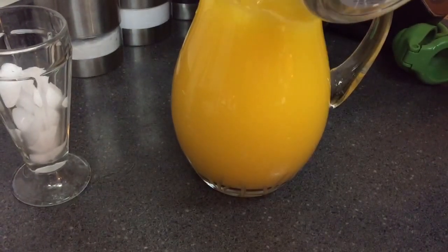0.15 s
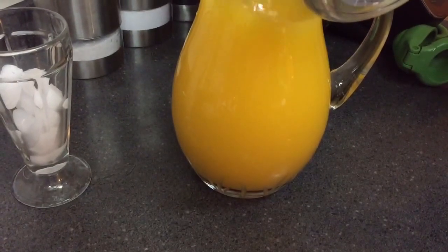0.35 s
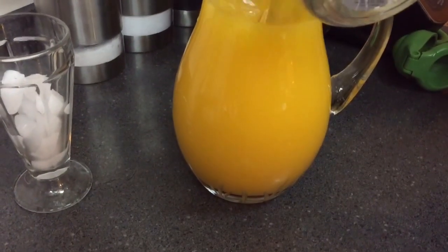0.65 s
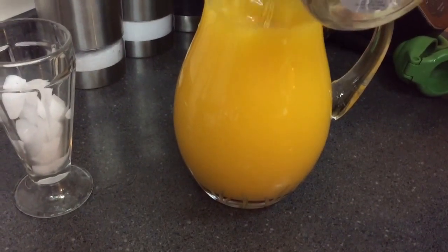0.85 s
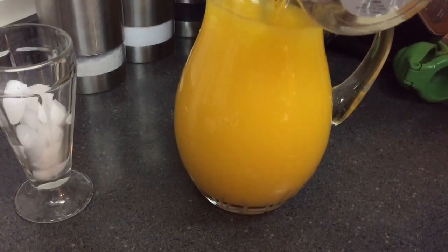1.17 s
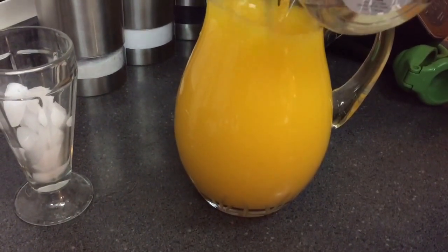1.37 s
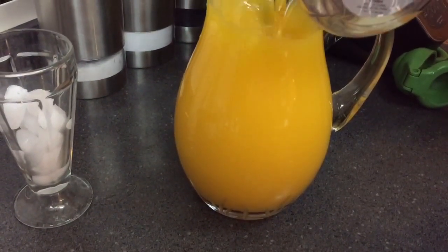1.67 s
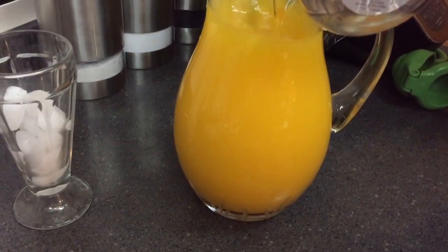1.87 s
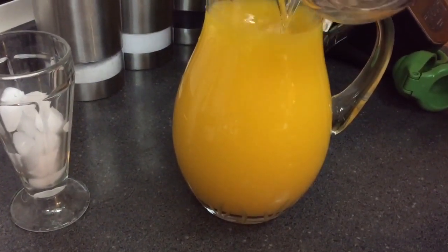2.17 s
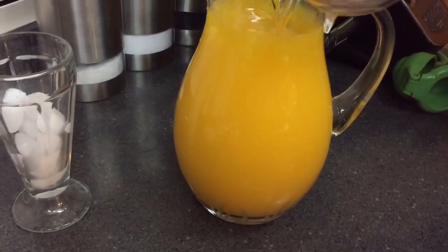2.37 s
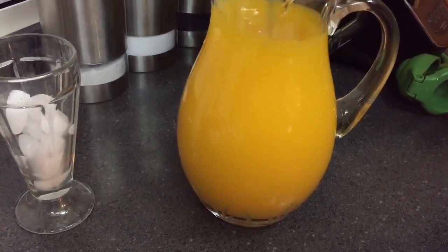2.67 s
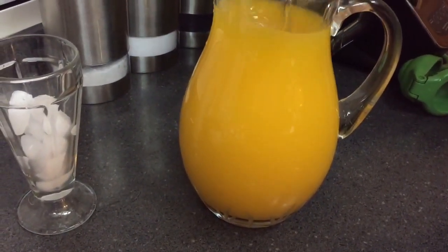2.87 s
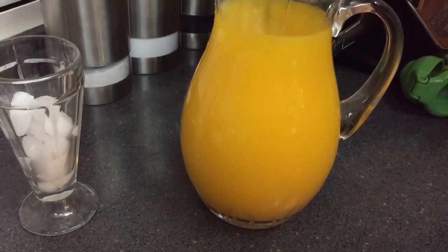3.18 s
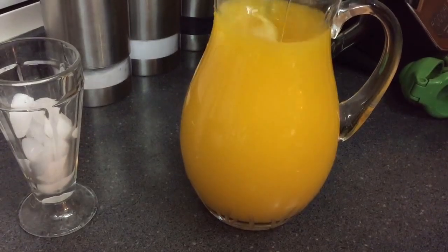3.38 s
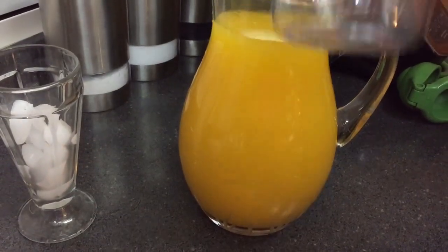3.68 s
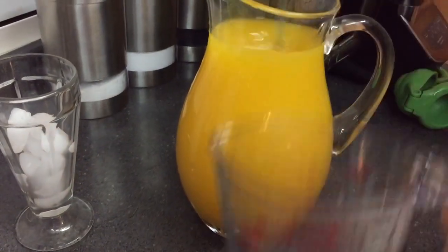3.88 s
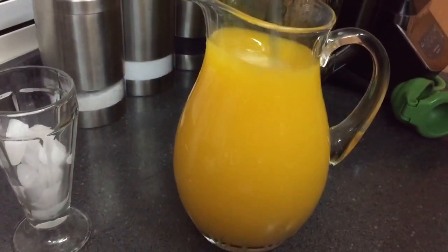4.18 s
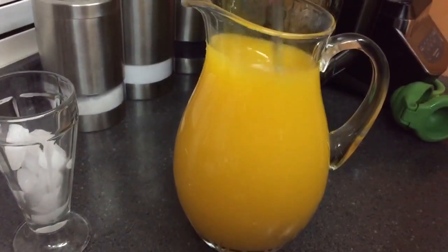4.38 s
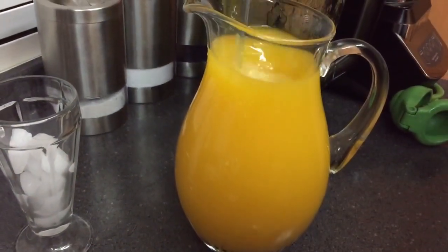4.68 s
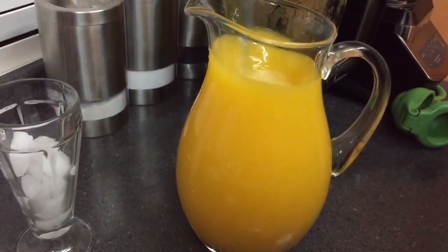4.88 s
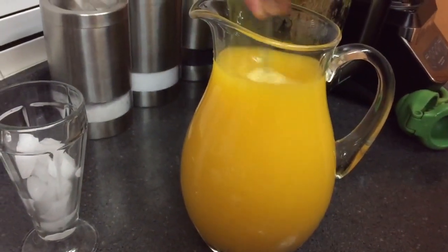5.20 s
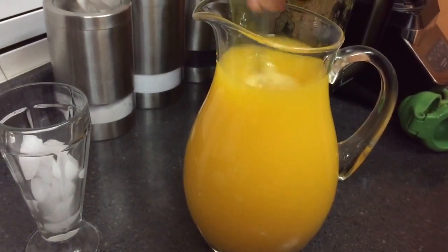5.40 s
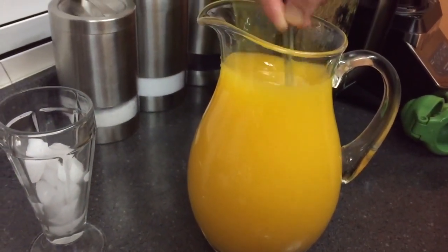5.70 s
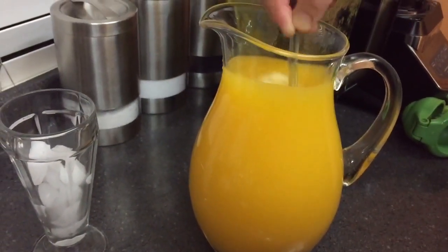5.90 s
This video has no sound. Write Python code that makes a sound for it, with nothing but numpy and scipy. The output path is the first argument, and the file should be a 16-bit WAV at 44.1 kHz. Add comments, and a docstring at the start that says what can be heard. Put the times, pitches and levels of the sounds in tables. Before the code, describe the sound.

From the start, juice pours from a jar into a full glass pitcher, gurgling, plopping and spattering in small surges. At the same time a long spoon knocks the pitcher's wall four or five times a second, each knock a short, damped clack with a soft low thump from the counter. The stirring pauses at about 2.7 seconds and the pour dies away by 3. Between 3 and 3.7 seconds the jar clinks lightly and scrapes on the rim, with a couple of low glugs. Stirring resumes near 4 seconds, shorter and sharper, and continues to about 6. At 4.5 seconds the empty jar lands on the counter with a bright knock, the loudest sound, then slides briefly, and slides again just after 5. It knocks once more near 6 seconds. Everything sounds close, in a quiet kitchen with a faint low rumble.

```python
"""Pouring and stirring juice

Juice bubbles and spatters from a glass jar into a full glass pitcher on a kitchen counter.
A long spoon knocks the wall four or five times a second; the liquid damps the glass to a short clack.
The jar clinks and scrapes on the rim, then is set down empty and pushed along as the stirring goes on."""
import sys
import numpy as np
from scipy import signal
from scipy.io import wavfile
from scipy.ndimage import uniform_filter1d

SR = 44100
rng = np.random.default_rng(int(sys.argv[2]) if len(sys.argv) > 2 else 0)


def dump_mix(stems):
    """Bounce the given channels to the path in sys.argv[1] as a 16-bit WAV at rate SR."""
    frames = np.atleast_2d(stems).T  # one column per channel
    limited = np.clip(frames, -1, 1)  # hard clip at full scale
    pcm = np.round(limited * 32767).astype(np.int16)
    wavfile.write(sys.argv[1], SR, pcm)


N = 266805
EDGE_HZ = 15600


def amp(db):
    return 10 ** (np.asarray(db) / 20)


def unit_rms(x):
    return x / np.sqrt(np.mean(x ** 2) + 1e-20)


def unit_energy(x):
    return x / np.sqrt(np.sum(x ** 2, -1, keepdims=True) + 1e-20)


def log_interp(points, hz):
    f, value = np.transpose(points)
    return np.interp(np.log(hz + 1), np.log(f + 1), value)


def add(mix, start_s, sound):
    part = mix[max(round(start_s * SR), 0):][:len(sound)]
    part += sound[:len(part)]


def colour(x, points):
    """Minimum-phase filter through (Hz, dB) points."""
    log_gain = np.log(amp(log_interp(points, abs(np.fft.fftfreq(4096, 1 / SR)))))
    taps = np.fft.ifft(np.exp(np.conj(signal.hilbert(log_gain)))).real
    return signal.fftconvolve(x, taps[:len(taps) // 2])[:len(x)]


def swell(start_s, length_s, attack_s, release_s):
    """Linear rise, hold until length_s, exponential fall."""
    t = np.arange(N) / SR - start_s
    return np.clip(t / attack_s, 0, 1) * np.exp(-np.maximum(t - length_s, 0) / release_s)


def wander(depth_db, samples):
    """Smooth random gain."""
    return amp(depth_db * unit_rms(uniform_filter1d(rng.standard_normal(N), size=samples)))


def bubble(hz, cycles, glide):
    """A dying sine; with glide its pitch climbs, as a bubble's does near the surface."""
    turns = np.arange(int(5 * cycles * SR / hz) + 2) * hz / SR
    age = turns / cycles
    return np.sin(2 * np.pi * turns * (1 + glide * age)) * np.exp(-age) * (1 - np.exp(-turns))


def bubbles(per_s, hz, octaves, cycles, range_db):
    """A steady random stream of bubbles around one pitch, rms 1."""
    out = np.zeros(N)
    for when, pitch, size in rng.random((int(per_s * N / SR), 3)):
        pop = bubble(hz * 2 ** (octaves * (2 * pitch - 1)), cycles, glide=0.0068)
        add(out, when * N / SR, amp(range_db * size) * pop)
    return unit_rms(out)


# Kitchen air. Each row: frequency in Hz, relative density in dB.
AIR_SPECTRUM = [(15, -47), (25, -6.5), (86, -2), (193, 2.5), (389, -9), (782, -17.5), (1050, -14),
                (1530, -21), (1900, -18), (2490, -20), (3260, -23.5), (6050, -26), (14300, -34),
                (15500, -34.5)]


def room_tone(pour_end_s=3.03):
    """Quiet air and a lumpy low rumble that swells briefly as the pour ends."""
    air = unit_rms(colour(rng.standard_normal(N), AIR_SPECTRUM))
    rumble_spectrum = [(20, -15.5), (45, -5.5), (78, 16), (130, -13), (260, -27.5), (600, -45)]
    rumble = unit_rms(colour(rng.standard_normal(N), rumble_spectrum)) * wander(3.5, samples=3000)
    lift = 1 + swell(pour_end_s, length_s=0.52, attack_s=0.013, release_s=0.04)
    return amp(-65) * air + amp(-69) * rumble * lift


# Surges, about one per turn of the spoon. Each row: start in seconds, gurgle in dB, spatter in dB.
STREAM_SURGES = [(0.059, -74, -66), (0.56, -57, -69), (0.958, -49, -62), (1.412, -65, -58.5),
                 (1.852, -79, -61), (2.47, -61.5, -65), (2.81, -68, -64)]


def pour():
    """The stream gurgles in the pitcher's neck, resonant near 1 kHz, sheds larger bubbles and spatters."""
    neck = bubbles(per_s=90, hz=1000, octaves=0.17, cycles=7, range_db=16)
    gurgle = bubbles(per_s=600, hz=1450, octaves=1.15, cycles=5, range_db=20)
    blips = bubbles(per_s=45, hz=1500, octaves=0.8, cycles=12, range_db=14)
    spatter = bubbles(per_s=1800, hz=4200, octaves=0.7, cycles=9, range_db=20)
    mist = bubbles(per_s=3000, hz=10500, octaves=0.5, cycles=9, range_db=14)
    low = amp(-0.8) * neck + amp(-6) * gurgle + amp(-2.5) * blips
    high = amp(-9) * spatter + amp(-21.5) * mist
    flow = swell(0, length_s=2.53, attack_s=0.024, release_s=0.12)
    out = (amp(-68) * low + amp(-66.5) * high) * flow
    for start_s, gurgle_db, spatter_db in STREAM_SURGES:
        surge = swell(start_s, length_s=0.071, attack_s=0.024, release_s=0.024)
        out += (amp(gurgle_db) * low + amp(spatter_db) * high) * surge
    return out


def burst(db, hz, octaves, length_s, count=130):
    """A clump of tiny bubbles popping."""
    out = np.zeros(SR // 4)
    for when, pitch, size in zip(rng.random(count), rng.standard_normal(count), rng.random(count)):
        pop = bubble(np.clip(hz * 2 ** (octaves * pitch), 500, EDGE_HZ), cycles=14.5, glide=0.006)
        add(out, when * length_s, amp(18 * size) * pop)
    return amp(db - 7.5) * unit_energy(out) * np.sqrt(length_s * SR)


# Loudest spray. Each row: start in seconds, relative level in dB, centre in Hz, spread in octaves,
# length in seconds.
SPRAY_BURSTS = [(0.062, -51.5, 6800, 0.47, 0.041), (0.133, -59, 5000, 0.22, 0.061),
                (0.302, -56, 8040, 0.57, 0.03), (0.547, -45, 5000, 0.4, 0.015),
                (1.472, -55, 11600, 0.13, 0.01), (1.475, -46, 1690, 0.025, 0.048),
                (1.506, -48.5, 5600, 0.54, 0.011), (1.716, -47.5, 12350, 0.041, 0.025),
                (1.712, -46.5, 2430, 0.54, 0.037), (1.759, -51, 12500, .07, 0.013),
                (1.881, -45.5, 5100, 0.116, 0.011), (1.89, -51, 10500, 0.335, 0.019),
                (1.938, -49.5, 4750, .9, 0.044), (2.394, -51.5, 4060, 0.81, 0.027),
                (2.492, -48.5, 2930, 0.24, 0.034), (2.562, -47, 2250, 1, 0.023),
                (2.851, -50.5, 1610, 0.58, 0.027), (3.253, -47, 5760, 0.16, 0.0081)]


def spray(faint_count=14, faint_end_s=2.3):
    """Loud bursts of bubbles, with faint ones scattered over the strong part of the pour."""
    out = np.zeros(N)
    for start_s, *shape in SPRAY_BURSTS:
        add(out, start_s, burst(*shape))
    for k, (when, pitch) in enumerate(rng.random((faint_count, 2))):
        faint = burst(db=-66.5, hz=8600 * 2 ** (pitch - 0.5), octaves=0.46, length_s=0.018)
        add(out, (k + when) / faint_count * faint_end_s, faint)
    return out


# Dense short-lived modes of glass and spoon. Each row: frequency in Hz, relative density in dB.
CLACK_SPECTRUM = [(100, -24.5), (400, -1.5), (900, 0.5), (1400, -4.5), (1900, -1), (2550, -2), (3000, -9.5),
                  (4200, -13), (6000, -17), (7500, -29.5), (10000, -38.5), (15000, -50.5)]


def strike(modes, ring, rise_s, scatter_db, detune, phase_spread, clack_db, clack_t60_s):
    """A blow on glass: modes weighted by where it lands, plus a clack; ring scales all decay times."""
    t = np.arange(SR // 2) / SR
    hz, db, t60 = np.transpose(modes)[:, :, None]
    phase = phase_spread * rng.random(hz.shape)
    weight = amp(db + scatter_db * rng.standard_normal(hz.shape))
    hz = hz * (1 + detune * rng.standard_normal(hz.shape))  # the wall's load shifts between blows
    onset = 1 - np.exp(-(t / rise_s) ** 2)  # the bending wave fills the wall
    tones = unit_energy(np.sin(2 * np.pi * (hz * t + phase)) * amp(-60 * t / (t60 * ring)) * onset)
    body = unit_energy((weight * tones).sum(0))
    noise = rng.standard_normal(len(t)) * amp(-60 * t / (clack_t60_s * ring)) * (onset + 0.5)
    clack = unit_energy(colour(noise, CLACK_SPECTRUM))
    return unit_energy(body + amp(clack_db) * clack) * np.sqrt(0.03 * SR)  # energy of 30 ms at rms 1


# Filled pitcher. Each row: frequency in Hz, energy in dB, base t60 in seconds.
PITCHER_MODES = [(189.5, -23.5, 0.3), (266.5, -19.5, 0.22), (426, -21, 0.065), (469.5, -18.5, 0.12),
                 (635, -15, 0.12), (745, -17.5, 0.11), (823, -20, 0.093), (921, -12, 0.06),
                 (1010, -5.5, 0.063), (1041.5, -8, 0.048), (1179, -11.5, 0.064), (1354, -15.5, 0.031),
                 (1630, -16.5, .045), (1833, -15, 0.013), (2037, -23, 0.01), (2216, -24, 0.22),
                 (2420, -13.5, 0.087), (2458.5, -15.5, 0.093), (2660, -38.5, 0.147)]
# Tone bands of a contact, in Hz.
BANDS_HZ = [450, 1000, 2000, 4800, 11000]


def pitcher(db, gains_db, ring):
    """One contact rings the pitcher, coloured by gains_db at BANDS_HZ."""
    blow = strike(PITCHER_MODES, ring, rise_s=0.0022, scatter_db=2.5, detune=0.017,
                  phase_spread=1, clack_db=-2.5, clack_t60_s=0.048)
    return amp(db + 1.5) * colour(blow, list(zip(BANDS_HZ, gains_db)))


# Spoon knocks, two a turn. Each row: start in seconds, relative level in dB, bass in dB, hardness in dB.
SPOON_KNOCKS = [(0.0725, -36, -3, -14.5), (0.269, -35.5, -3, 1), (0.499, -38, 0, 2), (0.719, -32.5, 0, -6),
                (0.9232, -33.5, 4.5, 0.5), (1.13, -31, -1.5, -4), (1.3528, -39.5, 3, 2.5),
                (1.5765, -42, -5, -5.5), (1.7653, -36, -0.5, 3.5), (1.991, -37, -2, 3),
                (2.205, -36, -3, -3), (2.4276, -38.5, -0.5, -3), (2.661, -46, 1.5, 6),
                (3.9587, -40, 0, -10), (4.1498, -37, -2.5, 0.5), (4.2556, -39, -7, -5.5),
                (4.378, -38.5, -2.5, -1), (4.594, -35.5, -5, 1.5), (4.8179, -30.5, -11.5, -2),
                (4.9223, -48, -18, -5.5), (5.0537, -34.5, -3.5, -1), (5.0938, -44, -14, -8.5),
                (5.279, -28.5, -11, -3.5), (5.5, -30, -6.5, 0.5), (5.7168, -37.5, 6, 2.5),
                (5.924, -35, 2.5, -4.5), (6.022, -41, -10, -0.5)]
# A knock's top three bands. Each row: base gain in dB, dB per dB of hardness.
KNOCK_TREBLE = [(2.5, 0.73), (-0.93, 1.05), (1.5, 1.25)]


def spoon(low_grip_s=4.05, graze_s=0.024, rebound_s=0.06):
    """The spoon grazes, knocks and chatters on the wall; held lower, it knocks shorter and sharper."""
    out = np.zeros(N)
    for start_s, db, bass_db, hardness_db in SPOON_KNOCKS:
        mid_db, high_db, top_db = [base + slope * hardness_db for base, slope in KNOCK_TREBLE]
        ring, lift_db = (0.98, 0) if start_s < low_grip_s else (0.59, 2)
        knock = pitcher(db, [bass_db, 0, mid_db + lift_db, high_db, top_db], ring)
        add(out, start_s, knock)
        for before, after in rng.random((3, 2)):
            add(out, start_s - before * graze_s, amp(-26.5) * (1 - before) * knock)
            add(out, start_s + after * rebound_s, amp(-21) * (1 - after / 2) * knock)
    return out


# Countertop. Each row: frequency in Hz, relative level in dB, t60 in seconds.
COUNTER_MODES = [(48.2, -9, 0.4), (75.9, -4.5, 0.28), (101, -1.5, 0.15), (141, -9.5, 0.12)]


def counter_boom():
    """Each spoon knock pushes the countertop, which answers with a soft boom."""
    out, t = np.zeros(N), np.arange(SR // 2) / SR
    onset = 1 - np.exp(-t / 0.0045)
    for start_s, db, bass_db, _ in SPOON_KNOCKS:
        boom = sum(amp(mode_db - 60 * t / t60) * np.sin(2 * np.pi * (hz * t + rng.random()))
                   for hz, mode_db, t60 in COUNTER_MODES)
        add(out, start_s, amp(db + bass_db - 7) * boom * onset)
    return out


# Lumps of juice. Each row: start in seconds, relative level in dB, brightness in dB.
JUICE_PLOPS = [(0.4065, -57.5, 10), (0.5827, -49.5, -8), (0.6855, -36.5, -0.5), (0.7922, -47, 4),
               (0.897, -45, 0), (1.1071, -47, -6), (1.2113, -53.5, 8), (1.9342, -51, 7.5), (2.16, -54, 1),
               (2.4768, -46.5, 2), (2.8169, -45, -9.5)]


def plops():
    """Soft lumps drop into the neck and wake mostly the pitcher's resonance near 1 kHz."""
    out = np.zeros(N)
    for start_s, db, bright_db in JUICE_PLOPS:
        add(out, start_s, pitcher(db, [-3.5, -1, bright_db - 7, bright_db - 14, 6.5], ring=1.58))
    return out


# Rim on rim. Each row: start in seconds, relative level in dB, hardness in dB.
RIM_CLINKS = [(0.9121, -51, -8), (1.315, -56, -5.5), (3.0345, -55, -2.5), (3.457, -65, 9),
              (3.685, -46.5, -5)]


def rim_clinks():
    """The jar taps the pitcher: a light, very bright contact of glass on glass."""
    out = np.zeros(N)
    for start_s, db, hard_db in RIM_CLINKS:
        add(out, start_s, pitcher(db, [-1.5, 1, 6.5, 16.5 + hard_db, 36.5 + hard_db], ring=1.15))
    return out


# Low thumps. Each row: start in seconds, relative level in dB, pitch in Hz.
LOW_THUMPS = [(3.041, -48.5, 192), (3.238, -61, 268), (3.69, -41.5, 192), (5.573, -52, 318),
              (5.615, -44.5, 310)]


def low_thumps():
    """Short low tones, near 190 to 320 Hz, ring for a few cycles and die away."""
    out = np.zeros(N)
    for start_s, db, hz in LOW_THUMPS:
        add(out, start_s, amp(db + 6.5) * bubble(hz, cycles=2.25, glide=0.0018))
    return out


# Rim dragging on rim. Each row: frequency in Hz, relative density in dB.
SCRAPE_SPECTRUM = [(300, -44), (1100, 1), (1500, -12), (2200, 7.5), (3200, -16), (5600, 0), (9000, -16),
                   (15000, -21)]


def rim_scrape():
    """Tiny slips of glass on glass grow as the jar is drawn away."""
    slips = rng.standard_normal(N) * amp(4.2 * rng.exponential(1, N))
    drag = swell(start_s=3.385, length_s=0.079, attack_s=0.068, release_s=0.012)
    return amp(-56.5) * unit_rms(colour(slips, SCRAPE_SPECTRUM)) * drag


# Empty jar. Each row: frequency in Hz, energy in dB, base t60 in seconds.
JAR_MODES = [(190, -11.5, 0.29), (390, -8.5, 0.12), (414, -7, 0.36), (466, -6, 0.038), (524, -28.5, 0.062),
             (734, -3.5, 0.091), (833, -19, 0.2), (1470, -11, 0.15), (2115, 4.5, 0.082),
             (2127, -13.5, 0.12), (2380, -5.5, 0.032), (3690, -18, 0.034), (4150, -9.5, 0.057),
             (4340, -11, 0.013), (4880, -27, 0.028), (5480, -16, 0.029), (5780, -17.5, 0.035),
             (6900, -26.5, .035), (7600, -28, 0.029)]
# Landing, rocking back, late knock. Each row: start in seconds, relative level in dB, brightness in dB.
JAR_KNOCKS = [(4.4913, -21.5, -2), (4.5168, -27.5, -7.5), (6.0428, -26.5, -10.5)]


def jar_landing():
    """The jar hits the counter with a bright tick and rings briefly, damped by the hand."""
    out, t = np.zeros(N), np.arange(SR // 2) / SR
    grip = np.exp(-t / 0.04)
    tick_envelope = amp(-60 * t / 0.024) * np.clip(t / 0.00064, 0, 1)
    for start_s, db, bright_db in JAR_KNOCKS:
        blow = strike(JAR_MODES, ring=0.73, rise_s=0.0019, scatter_db=1.5, detune=0.00146,
                      phase_spread=0.45, clack_db=-14.5, clack_t60_s=0.018)
        tick = colour(rng.standard_normal(len(t)), [(3000, -21), (6000, 10.5), (13000, -1)])
        hit = grip * blow + amp(-10.5) * tick * tick_envelope
        add(out, start_s, amp(db + 3) * colour(hit, [(800, 0.0075), (2000, bright_db)]))
    return out


def counter_thud():
    """The countertop gives for a few low cycles as the jar first touches down."""
    out = np.zeros(N)
    add(out, JAR_KNOCKS[0][0], amp(-36.5) * bubble(hz=160, cycles=4.5, glide=0))
    return out


# Sliding jar. Each row: centre in Hz, width in Hz, relative level in dB.
RUB_RESONANCES = [(1020, 270, 7), (2280, 170, 9), (4060, 280, 2.5), (4750, 230, -6.5), (5460, 220, 5),
                  (6580, 350, -6), (7850, 180, -5), (8540, 300, -5.5), (9700, 200, -12.5),
                  (11600, 350, -13), (13160, 360, -8), (14750, 300, -12.5)]
# Pushes. Each row: start in seconds, length in seconds, relative rub in dB, judder in dB.
JAR_PUSHES = [(4.529, 0.34, -61, -56.5), (5.126, 0.24, -56, -52.5)]


def jar_sliding():
    """Tiny slips on the grainy counter give a rub with many narrow peaks, over a lumpy low judder."""
    hz = np.geomspace(300, EDGE_HZ, 600)
    centre, width, db = np.transpose(RUB_RESONANCES)[:, :, None]
    peaks = amp(db) / (1 + ((hz - centre) / width) ** 2)
    power = (peaks ** 2).sum(0) + amp(-21) ** 2
    catching = wander(1.9, samples=500)  # the base catches unevenly
    slips = rng.standard_normal(N) * amp(2.4 * rng.exponential(1, N)) * catching
    rub = unit_rms(colour(slips, np.c_[hz, 10 * np.log10(power)]))
    judder = bubbles(per_s=190, hz=394, octaves=0.47, cycles=2.7, range_db=17)  # short low rings
    out = np.zeros(N)
    for start_s, length_s, rub_db, judder_db in JAR_PUSHES:
        push = swell(start_s, length_s, attack_s=0.048, release_s=0.034)
        out += (amp(rub_db + 2) * rub + amp(judder_db) * judder) * push
    return out


# Room decay. Each row: frequency in Hz, t60 in seconds.
KITCHEN_T60 = [(100, 0.5), (300, 0.26), (1000, 0.22), (2500, 0.23), (6000, 0.14), (14000, 0.23)]


def kitchen(x, early_db, tail_db):
    """Near surfaces give a few quick echoes; the room adds a short tail."""
    t = np.arange(SR // 2) / SR
    taps = rng.choice([-1., 1.], len(t)) * (rng.random(len(t)) < 4000 / SR)
    build_up = np.clip(t / 0.0091, 0, 1) ** 2
    hz, when, spectra = signal.stft(taps * build_up, SR, nperseg=256)
    decay = amp(-60 * when / log_interp(KITCHEN_T60, hz)[:, None])
    tail = signal.istft(spectra * decay, SR, nperseg=256)[1][:len(t)]
    early = np.zeros(len(t))
    add(early, 0.004, rng.standard_normal(SR // 50) * (rng.random(SR // 50) < 0.02))
    response = amp(early_db) * unit_energy(early) + amp(tail_db) * unit_energy(tail)
    return signal.fftconvolve(x, response)[:N]


def scene():
    near = spoon() + plops() + rim_clinks() + rim_scrape()
    near += jar_landing() + counter_thud() + jar_sliding()
    near += pour() + spray() + low_thumps()
    return (near + kitchen(near, early_db=-15, tail_db=-11) + counter_boom() + room_tone())[None]


def record(dry):
    """Low-pass at EDGE_HZ."""
    taps = signal.firwin(511, EDGE_HZ, window=("kaiser", 9), fs=SR)
    return signal.oaconvolve(dry, taps[None], "same")


dry = scene()
out = record(dry)
dump_mix(out)
```